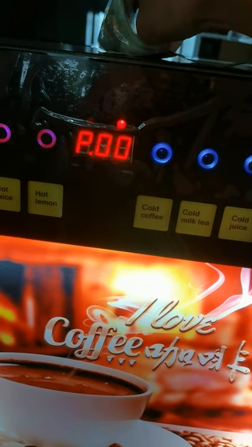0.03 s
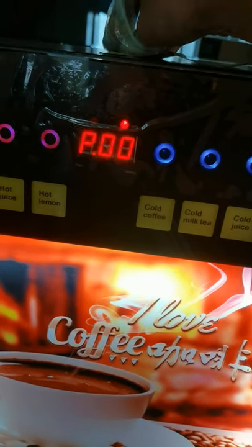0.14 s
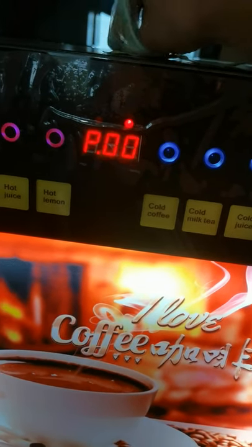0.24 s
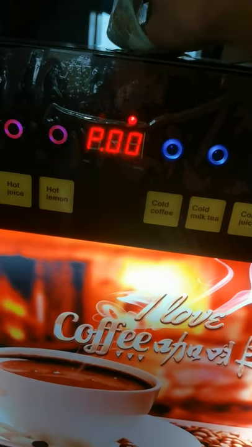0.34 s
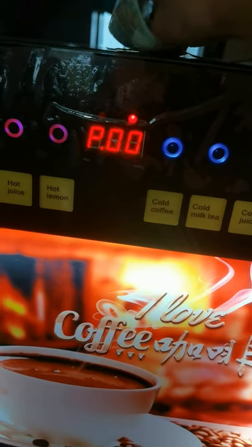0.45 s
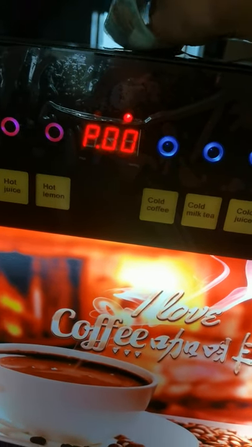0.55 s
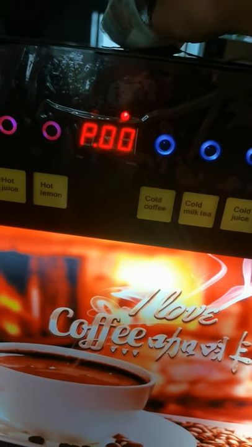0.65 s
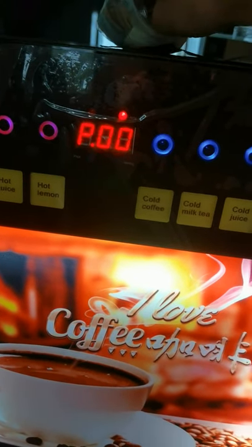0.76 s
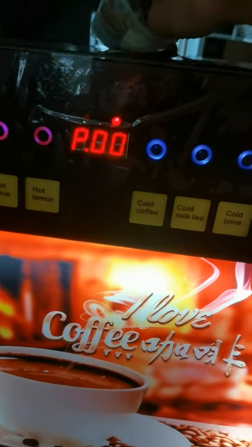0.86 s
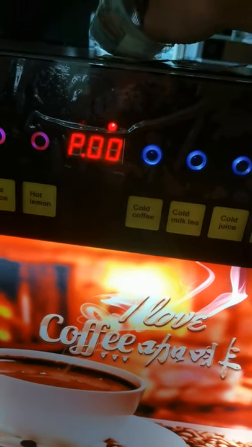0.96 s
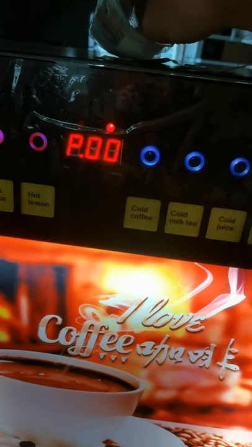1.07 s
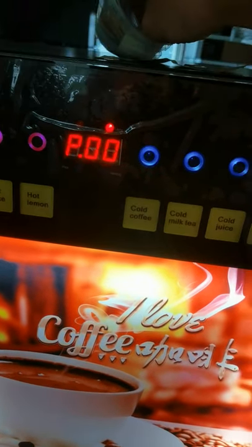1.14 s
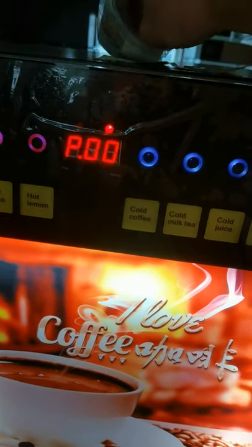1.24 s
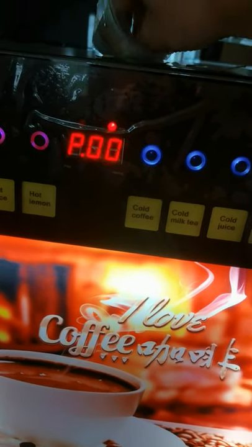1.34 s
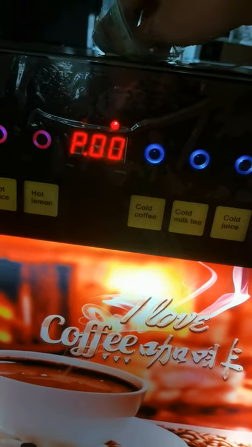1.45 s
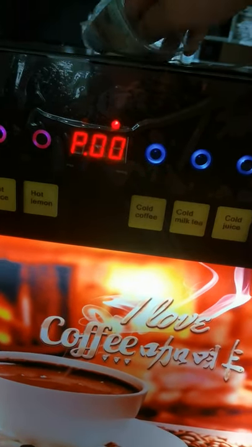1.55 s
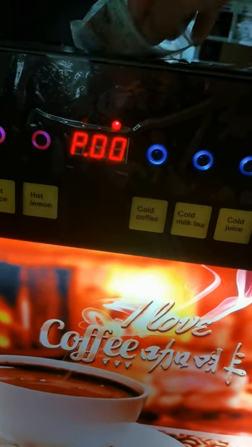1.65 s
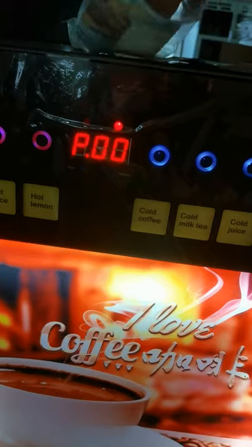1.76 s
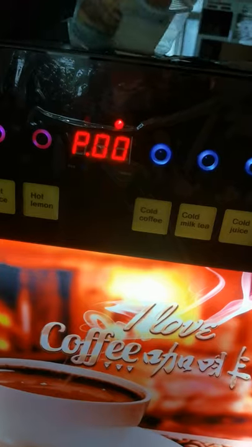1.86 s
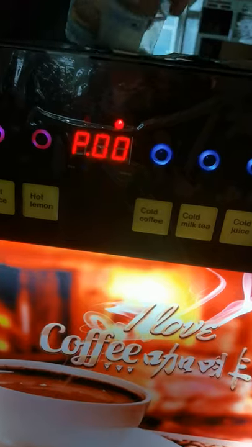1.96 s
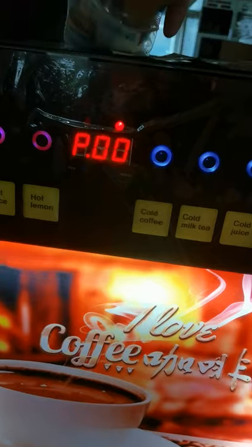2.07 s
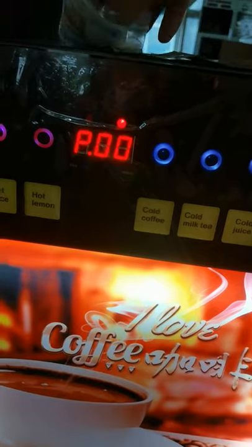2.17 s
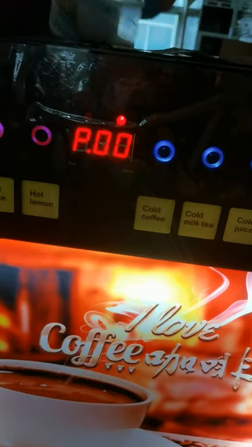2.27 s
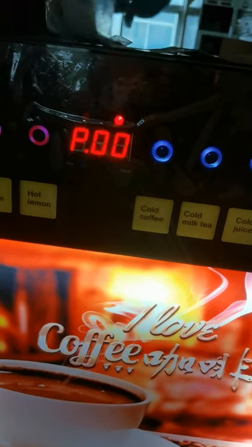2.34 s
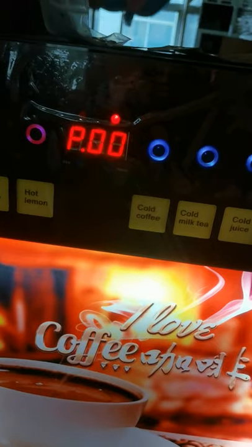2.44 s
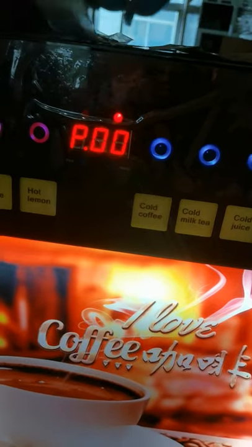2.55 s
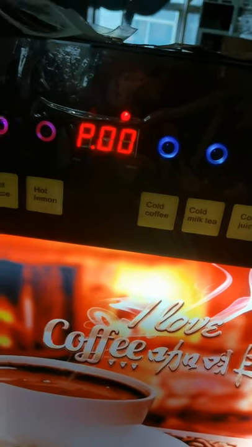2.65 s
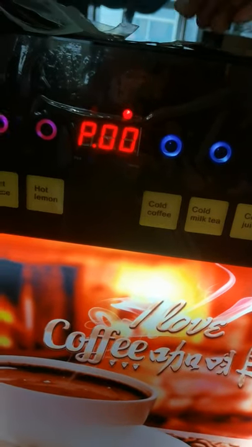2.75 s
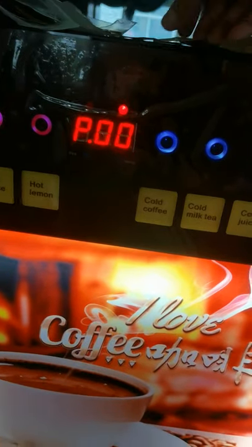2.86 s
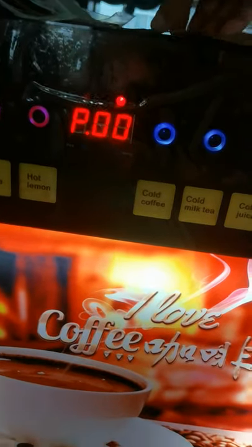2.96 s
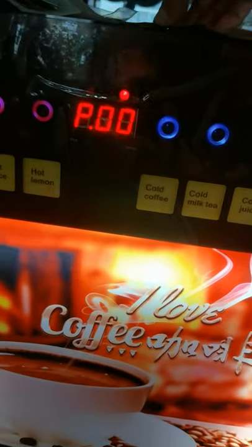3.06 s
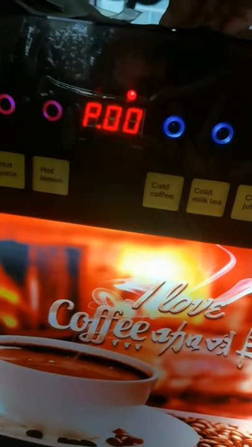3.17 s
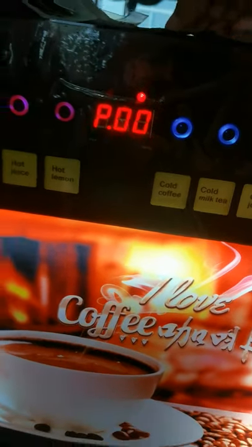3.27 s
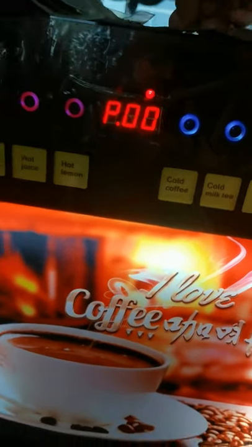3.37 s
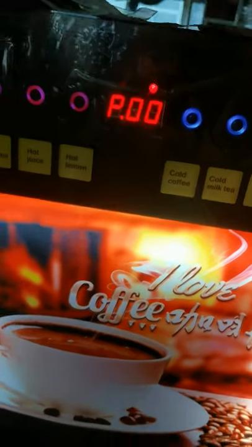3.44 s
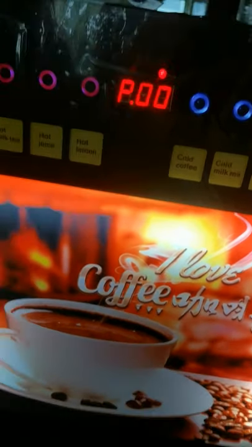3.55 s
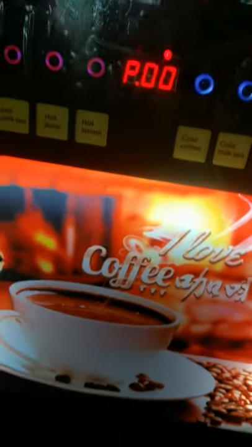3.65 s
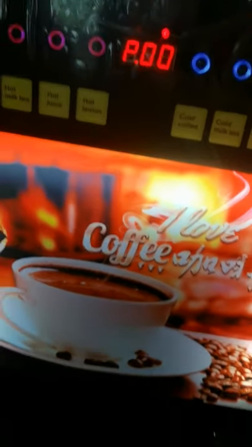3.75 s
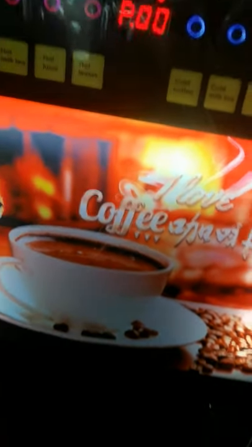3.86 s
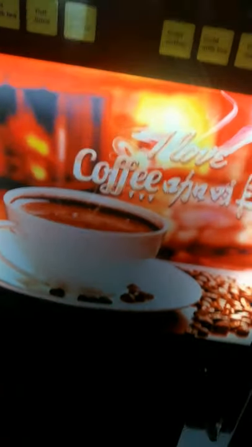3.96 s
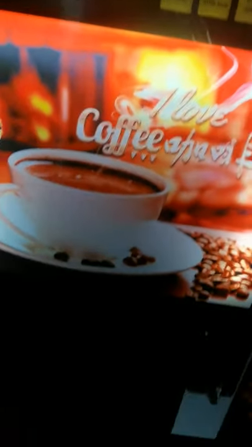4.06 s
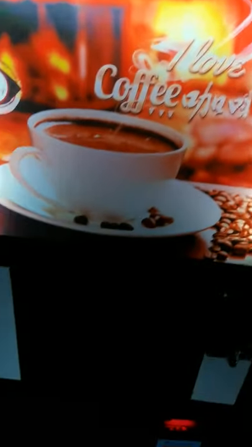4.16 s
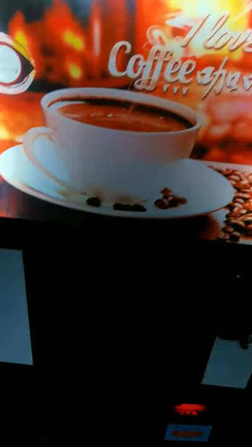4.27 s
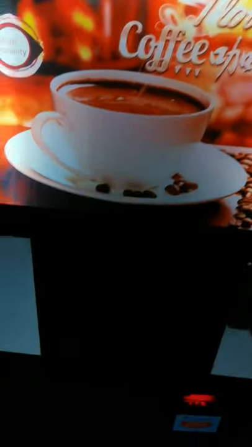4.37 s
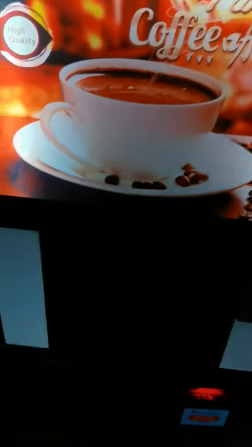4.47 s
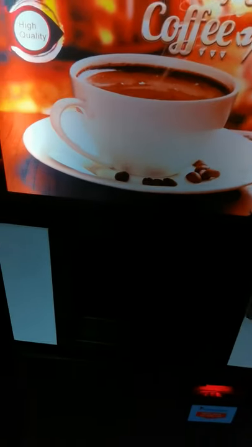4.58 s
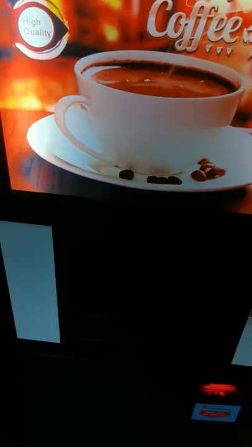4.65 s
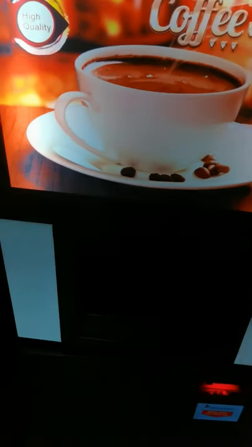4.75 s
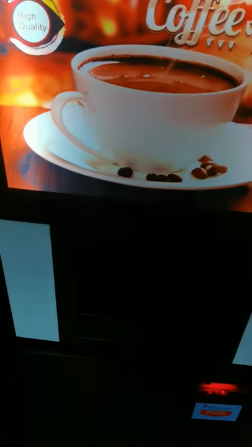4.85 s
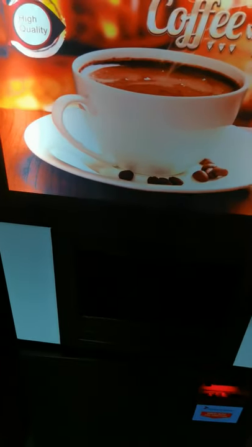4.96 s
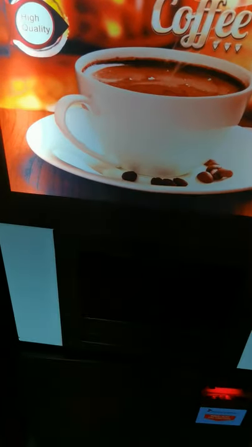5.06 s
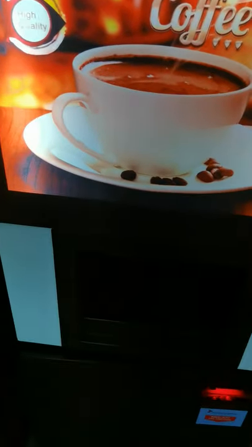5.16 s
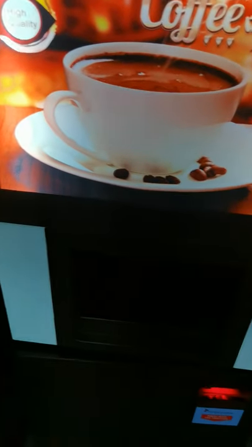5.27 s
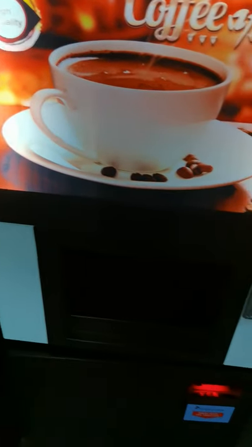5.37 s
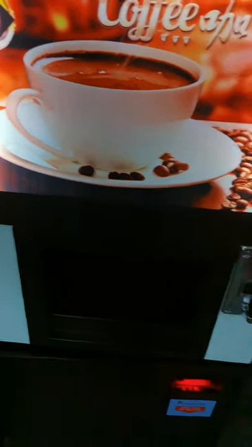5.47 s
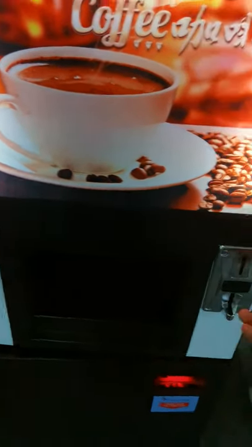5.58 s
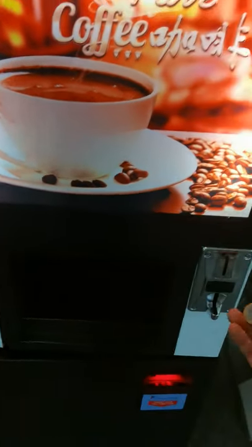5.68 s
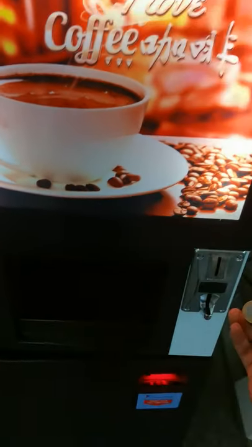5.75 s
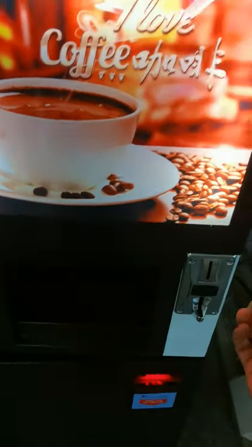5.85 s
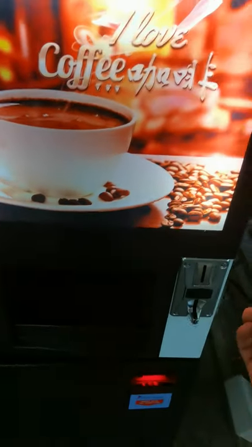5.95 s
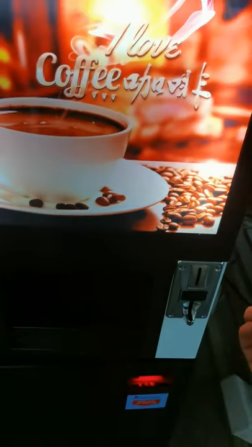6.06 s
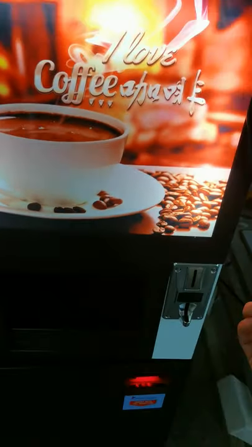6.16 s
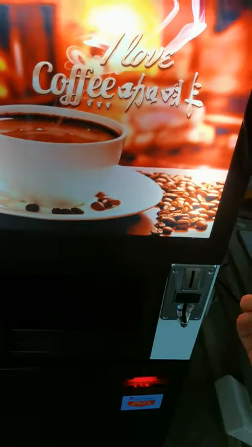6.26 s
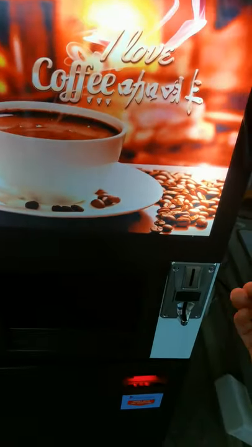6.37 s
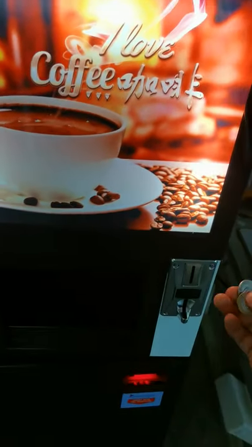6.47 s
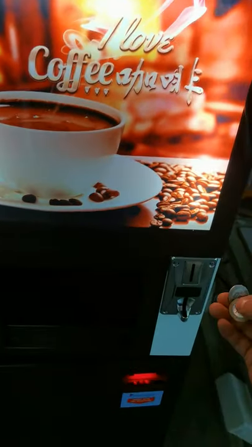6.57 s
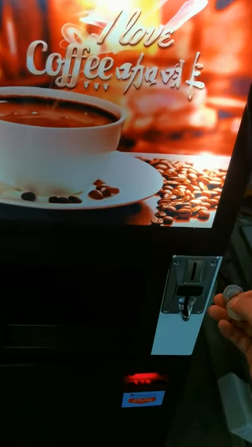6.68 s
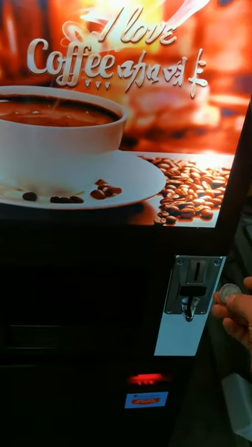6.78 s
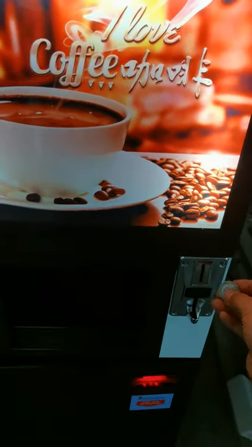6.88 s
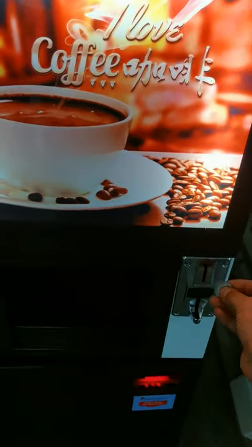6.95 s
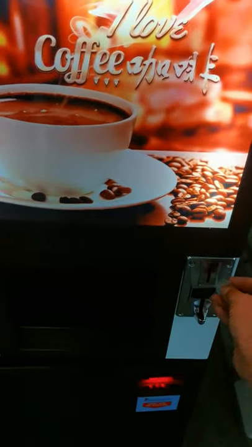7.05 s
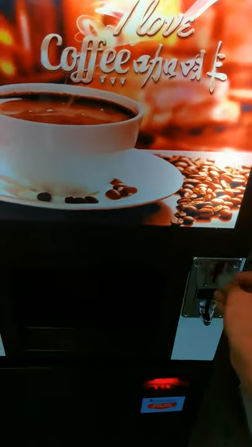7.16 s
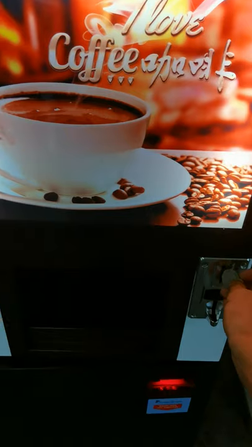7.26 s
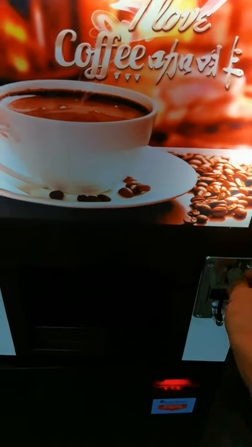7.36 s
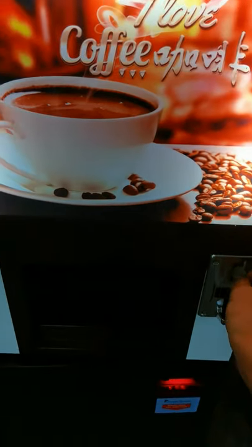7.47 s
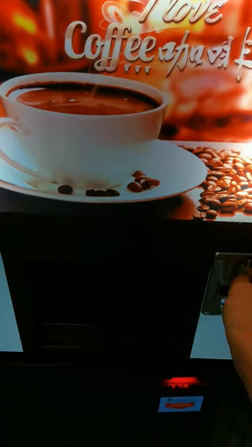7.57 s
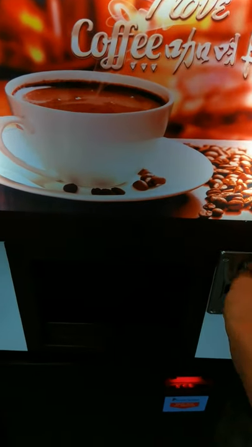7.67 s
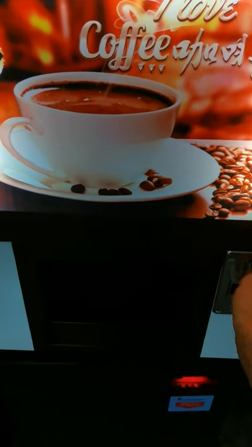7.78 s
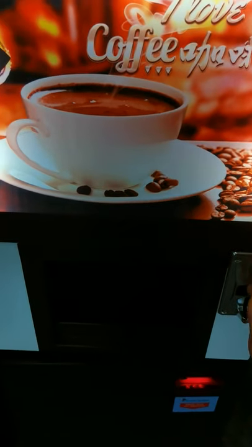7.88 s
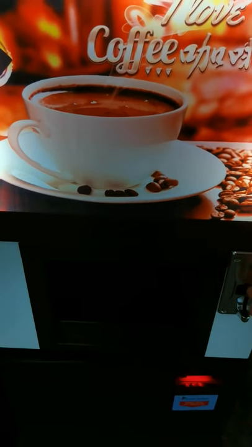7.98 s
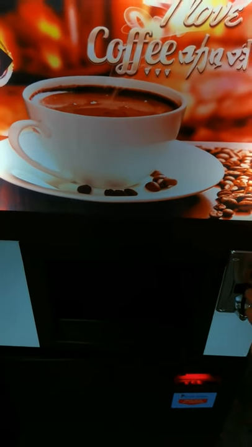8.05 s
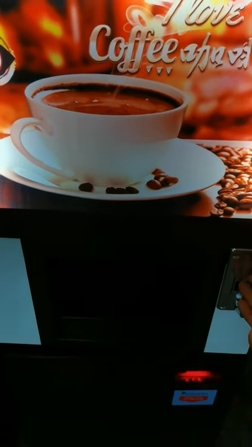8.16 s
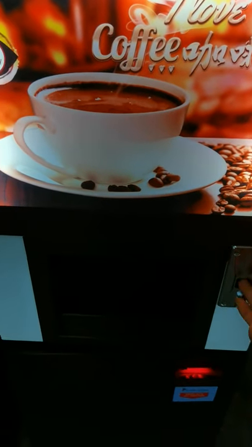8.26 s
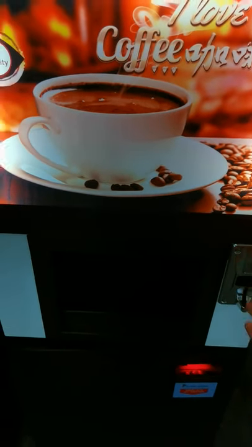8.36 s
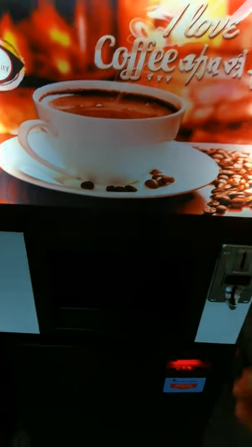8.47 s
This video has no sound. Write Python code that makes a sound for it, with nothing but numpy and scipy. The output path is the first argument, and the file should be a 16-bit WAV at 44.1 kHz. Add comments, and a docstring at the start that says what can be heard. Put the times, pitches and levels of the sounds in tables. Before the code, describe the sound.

A hand rummages through a plastic bag of coins, then a coin taps a humming vending machine's slot and rattles down the chute.

```python
"""A hand rummages in a plastic bag of coins on top of a drinks machine, and pushes make the sheet-metal
cabinet boom. At about 5 s coins knock on its front, then clink in the palm. From 7.2 s a coin taps and
scrapes the slot plate, and from 8 s it rattles down the chute. Each contact excites the damped modes of
the body it meets. Throughout, a hard room answers every click over the machine's hum and fan."""
import sys
import numpy as np
from scipy import signal
from scipy.fft import rfft, irfft, next_fast_len
from scipy.io import wavfile
from scipy.ndimage import uniform_filter1d, map_coordinates

SR = 44100
rng = np.random.default_rng(int(sys.argv[2]) if len(sys.argv) > 2 else 0)


def waveform_to_disk(signal):
    """Save audio, clipped to [-1, 1], as 16-bit WAV at the path in sys.argv[1]."""
    frames = np.transpose(np.atleast_2d(signal))
    scaled = np.clip(frames, -1, 1) * 32767
    samples = np.round(scaled).astype(np.int16)
    wavfile.write(sys.argv[1], SR, samples)


N = 375732

# Impacts. Each row: start in seconds, relative level in dB, bass in dB, brightness in dB,
# frequency of one added mode in Hz, its gain in dB, room tail in dB.
BAG_HITS = [(0.0179, -21, -8.5, -7, 2050, 22, -23), (0.1055, -6, -68, -19.5, 3450, 9, -27.5),
            (0.2239, -20.5, 0, -40, 3700, 0, -4.5), (0.3187, -7, -11, -26, 3740, 12, -32),
            (0.3379, -29.5, 2, -0.5, 1980, 7, -19), (0.4342, -30, -4, -10.5, 2180, 26, -28),
            (0.469, -29, -28.5, -9, 2050, 18.5, -20), (0.5382, -55, -3, 6.5, 4310, 39, -28),
            (0.5864, -27, -52, -16, 3800, -20, -22), (0.7888, -41.5, -67, -23, 2420, 1, -0.5),
            (0.838, -33.5, -21, -16.5, 3780, 17, -19.5), (0.8745, -26.5, -7, -23, 780, 26, -11.5),
            (0.9053, -22, 2, -17, 2240, 13, -15), (0.9328, -30.5, 13, -11.5, 6000, 11.5, -18),
            (0.943, -36, 0, -21, 3800, 6, -22), (1.0336, -28, -1, -12.5, 885, 16, -21.5),
            (1.0595, -23, -5.5, -6.5, 3300, 6, -20.5), (1.0809, -14, -50, -7, 3205, -2, -24),
            (1.1, -35, -30, -1, 5500, 6, -16), (1.2, -29.5, -20, -9.5, 4500, 9, -22),
            (1.265, -32.5, -50, -13, 5890, 26.5, -22.5), (1.3392, -25, -23, -14, 4020, 0, -21.5),
            (1.4217, -25, -12.5, -13.5, 824, 20, -19), (1.432, -21, 1, -17.5, 850, 13, -32),
            (1.4508, -27, -18.5, -23, 2956, 7, -18.5), (1.501, -39, -2.5, -4, 2350, 8, -15.5),
            (1.5873, -29, -12.5, -14.5, 2490, 10, -0.5), (1.7449, -21.5, -18.5, -27, 4400, 7, -18.5),
            (1.8083, -31, -9, -14, 4290, 1.5, -16.5), (1.8669, -13.5, -10, -6.5, 3500, -0.5, -7),
            (2.1662, -39, -13, -10.5, 5170, 9, -20), (2.176, -23, -20, -0.5, 4800, 10.5, -24.5),
            (2.194, -39.5, -25, 0, 6360, 8.5, -13.5), (2.385, -33.5, -16.5, -8.5, 3280, 22, -18),
            (2.4578, -38.5, -10.5, -8, 3400, 8, -12.5), (2.496, -38.5, -23, -5, 3020, 23, -25),
            (2.5205, -44, -35, -9.5, 3480, 8, -18), (2.5406, -21.5, -15, -6, 2420, 21.5, -24.5),
            (2.5536, -23.5, -12, -8.5, 2160, 25, -25.5), (2.566, -31, -6.5, -5.5, 2140, 17, -21.5),
            (2.6, -44.5, -15.5, 2.5, 9500, 13, -22)]
FRONT_HITS = [(4.9909, -41.5, 8.5, -20, 2000, 20, -8.5), (5.1889, -16.5, -17, -21, 3680, 7.4, -13),
              (5.229, -18, -9, -19.5, 2150, 11, -13.5), (5.248, -28, -4, -12, 1790, 5.4, -28),
              (5.2644, -24.5, -4, -16.5, 2400, 11, -32)]
PALM_HITS = [(1.1728, -23, -68, -1, 9700, 8, -11.5), (1.1891, -32.5, 1, -8.5, 3040, 8, -17),
             (3.7295, -27.5, -2, -25.5, 12230, 34.2, -23.5), (5.4778, -38.5, -33.5, 7, 11800, 20, -20),
             (5.8256, -47, -24, -11.5, 2520, 8.6, -21.5), (5.8594, -54, -21, -2, 2500, 8, -18),
             (6.2448, -40, -49.5, -3.5, 9200, 12, -14), (6.3007, -40.5, -53, -2.5, 3320, 17, -18),
             (6.3149, -56, -28.5, 13, 7100, 17, -22), (6.357, -64, -12, 6, 6360, 26, -11),
             (6.4095, -63.5, -25, 3, 6100, 33.5, -25), (6.6458, -48, -36, -3.5, 7220, 44.3, -10.5),
             (6.6543, -39.5, -17, 4, 15000, 22, -22.5), (6.8689, -46.5, -24.5, 4.5, 10900, 9, -15.5),
             (7.0459, -61, -21, 10.5, 5700, 24.6, -16)]
SLOT_HITS = [(7.2275, -49, -11.5, -10.5, 1140, 27, 2.5), (7.2544, -35, 3.5, -17, 1780, 18, -11.5),
             (7.3071, -10.5, -19, -15.5, 2430, 7.2, -12.5), (7.4744, -32.5, -20.5, -30, 1690, 22, -6),
             (7.5487, -39, -4, -25, 3500, 15, -10), (7.578, -38.5, -12, -40, 3500, 14, -18),
             (7.6361, -28, -18, -9, 3900, 11, -2.5), (7.6495, -18, -2, -0.5, 2240, 13.8, -11),
             (7.8109, -37.5, 4, -17, 1990, 27.3, -15.5), (7.9234, -48, -1.5, -47, 2070, 34.7, -7),
             (7.9568, -47, -7, -42, 2120, 36, -30)]
CHUTE_HITS = [(8.0336, -30, -3.5, -24, 2250, 10, -5), (8.104, -32, 0.5, -23, 1650, 4.2, -10),
              (8.1648, -41.5, 10, -27.5, 1690, 5.1, -6), (8.2551, -18.5, -10, -7, 1910, 11, -11),
              (8.2885, -18.5, -0.5, -18, 3580, 9.1, -11), (8.3015, -18, -7, -9.5, 3670, 14, -10.5),
              (8.3205, -16.5, -20, -11, 3300, 7.8, -15), (8.3938, -8.5, -13.5, -12.5, 935, 27.6, -6),
              (8.4677, -19, -7, -9.5, 935, 23, -0.5), (8.4991, -11.5, -14.5, -9.5, 1703, 11, -2.5),
              (8.5114, -15, -36, -7, 1690, 13, -1.5)]

# Damped modes of the struck bodies. Each row: frequency in Hz, bandwidth in Hz, gain in dB.
LID_MODES = [(520, 47.5, 17), (807, 30, 3.43), (1071, 41, 9.3), (2090, 680, 4), (3676, 270, 0.91),
             (5610, 2600, 5.4)]
FRONT_MODES = [(460, 58, 16.5), (1030, 74, 9), (1826, 133, 15.5), (2366, 100, 12.5), (3640, 90, 13.5),
               (5410, 92, 14), (6220, 77, 15)]
COIN_MODES = [(1014, 50, -34), (1850, 550, 8), (3630, 94, 9.5), (5090, 240, 6), (6260, 210, 7),
              (7700, 130, -6), (9600, 300, 6.5), (11880, 350, 19), (15200, 624, 1.5)]
PLATE_MODES = [(488, 13.4, 20), (2120, 250, 3.6), (3430, 140, 1)]
CHUTE_MODES = [(489, 19, 21.6), (931, 6.2, 13), (1171, 31, 4.99), (1736, 76, 14), (1810, 15, 5),
               (2010, 20, 9.8), (2062, 25, 13), (3424, 250, 3.3), (4500, 42, 2.15), (5340, 130, 4.1),
               (6230, 240, 7)]
# Panel modes. Each row: as above, before the response is squared.
BIG_PANEL_MODES = [(118, 8.2, 4), (146.2, 31, 2.5)]
SMALL_PANEL_MODES = [(230, 28, 0), (290, 54, -5), (352.6, 95, -10.5), (475, 120, -29)]

# Pushes. Each row: start in seconds, rise in seconds, relative peak in dB, small-panel gain in dB.
CABINET_PUSHES = [(0.04, 0.12, -37, -8.5), (0.222, 0.06, -28, -7), (0.53, 0.088, -43.5, -3),
                  (0.872, 0.11, -30.5, -4.5), (1.15, 0.12, -40.5, -14), (1.58, 0.06, -53.5, 4),
                  (1.868, 0.047, -28.5, -19), (2.52, 0.11, -60.5, 6.5), (2.8, 0.18, -27, -8),
                  (3.08, 0.035, -42, -6), (3.22, 0.13, -33, -11.5), (7.23, 0.047, -51, 7),
                  (7.42, 0.026, -53, 5), (7.645, 0.13, -47, 5.5), (8.28, 0.04, -44, 13),
                  (8.44, 0.019, -49, 3.5)]
# Friction strokes. Each row: start in seconds, rise in seconds, relative peak in dB, brightness in dB.
BAG_STROKES = [(0.0, 0.28, -46.5, 0), (0.15, 0.44, -54, -19), (0.6, 0.2, -66, 2), (1.0, 0.091, -68, -24),
               (1.55, 0.18, -44.5, -0.5), (1.9, 0.23, -53.5, 1.5), (2.17, 0.11, -60, 3.5),
               (2.34, 0.034, -57, 4.5), (2.45, 0.12, -58, -8), (5.235, 0.025, -44.5, -10.5)]
CABINET_CREAKS = [(2.88, 0.06, -51, -18), (3.27, 0.089, -51, -14.5)]

# Envelopes, the first two grouped in spans. Each row: time in seconds, relative level in dB.
PLATE_DRAG = [
    [(7.38, -52), (7.414, -55), (7.516, -51), (7.66, -64.5), (7.782, -66), (8.0, -52.5)],
]
CHUTE_ROLL = [
    [(8.02, -57.5), (8.154, -40.5), (8.324, -43), (8.45, -63), (8.52, -23)],
]
THROB_ENVELOPE = [(0.0, -51.5), (1.44, -58), (1.64, -54.5), (2.28, -55), (5.17, -60), (5.86, -50.5),
                  (6.19, -59), (6.76, -57), (7.17, -57), (7.55, -53), (7.76, -55), (8.04, -58), (8.16, -48),
                  (8.52, -72)]

# Noise spectra. Each row: frequency in Hz, relative spectral density in dB.
FRICTION_SPECTRUM = [(250, 4.5), (450, -5), (1000, -1), (2000, -1.5), (4000, -7.5), (7000, -29.5),
                     (11000, -34.5), (15800, -48)]
THROB_SPECTRUM = [(8.8, -34), (15, 7.5), (38, -7.5), (49, -2), (65, 5), (86, -15), (110, -8.5),
                  (140, -35.5), (240, -120)]
FAN_SPECTRUM = [(47, -43), (80, -7), (129, -9), (208, -15), (244, -11.5), (380, -18), (422, -18.5),
                (487, -21), (532, -25.5), (613, -24), (842, -29.5), (1680, -27.5), (2480, -27.5),
                (5500, -46.5), (7150, -82), (12100, -120)]
HISS_SPECTRUM = [(2940, -52), (5000, -16.5), (7060, -9), (8670, -18.5), (9680, -9.5), (14200, -2),
                 (15700, -5.5)]

# The machine's tones. Each row: frequency in Hz, relative level in dB.
WHINE_TONES = [(500.6, -73.5), (2202, -85), (2401, -83), (2449, -85), (2702, -83.5), (2799, -86.5)]
# Stereo width of throb and fan. Each row: frequency in Hz, correlation of left and right.
MACHINE_COHERENCE = [(60, 0.53), (180, 0.84), (550, 0.39), (1650, -0.33), (4970, 0.036), (15000, -0.04)]
# Balance of the fan. Each row: frequency in Hz, level of left over right in dB.
FAN_BALANCE = [(60, 12), (180, 1), (550, -0.5), (1650, -1.0), (4970, -1.5), (15000, -4.5)]
# The hard room. Each row: frequency in Hz, reverberation time in seconds.
ROOM_T60 = [(200, 0.21), (1000, 0.71), (4000, 0.44), (8000, 0.39), (15000, 0.37)]

CRACK_RISE_S, ROOM_RISE_S = 0.00029, 0.0064
FAN_DB, HISS_DB = -58, -77
BAND_LIMIT_HZ = 15800


def coin_impacts():
    """Impact excitation: coins sound the modes of lid, front, one another, slot plate and chute."""
    lid = impacts(BAG_HITS, LID_MODES, t60_s=0.007, scatter_db=3, pan_db=-8, top_db=-9.5, lag_samples=14)
    front = impacts(FRONT_HITS, FRONT_MODES, t60_s=0.026, scatter_db=1.5, pan_db=-8, top_db=-11.5)
    palm = impacts(PALM_HITS, COIN_MODES, t60_s=0.014, scatter_db=3.5, pan_db=-10, top_db=-9.5)
    slot = impacts(SLOT_HITS, PLATE_MODES, t60_s=0.059, scatter_db=5.5, pan_db=-8, top_db=-11)
    chute = impacts(CHUTE_HITS, CHUTE_MODES, t60_s=0.057, scatter_db=3, pan_db=-7.5, top_db=-5.5)
    return lid + front + palm + slot + chute


def impacts(hits, body, t60_s, scatter_db, pan_db, top_db, lag_samples=0):
    """Source and filter: a short noise crack and its room tail pass through the body's resonances."""
    pad = 256  # samples ahead of each contact
    out = np.zeros((2, N + SR))
    t = np.arange(-pad, SR // 2) / SR
    envelope = (1 - np.exp(-np.maximum(t, 0) / CRACK_RISE_S)) * amp(-60 * t / t60_s)
    side_db = np.array([[pan_db / 2], [-pan_db / 2]])
    for start, db, low_db, bright_db, ring_hz, ring_db, room_db in hits:
        colour = [(70, low_db - 31), (200, low_db - 13), (450, low_db), (950, low_db + 7),
                  (1900, 0.21 * low_db), (3500, 0.0098), (7800, bright_db),
                  (12500, top_db + 0.77 * bright_db)]
        # Each blow lands elsewhere and weights the modes differently.
        modes = [(hz, width, gain + scatter_db * rng.standard_normal()) for hz, width, gain in body]
        modes.append((ring_hz, 0.061 * ring_hz, ring_db))
        crack = envelope * rng.standard_normal(len(t))
        crack *= np.linalg.norm(envelope) / np.linalg.norm(crack)
        drive = amp(side_db) * crack + amp(room_db + 0.17 * side_db) * room_tail(t)
        response = lambda hz: amp(along(colour, hz)) * (1.5 + resonances(modes, hz))
        left, right = amp(db - 4) * filtered(drive, response)
        out[0, round(start * SR):][:len(t)] += left
        out[1, round(start * SR) + lag_samples:][:len(t)] += right
    return out[:, pad:N + pad]


def cabinet_boom():
    """Forced vibration: uneven pushes drive a few low modes of the sheet-metal panels."""
    push_db, small_db = swells(CABINET_PUSHES, rise_db=6, fade_db_per_s=134.5)
    force = amp(push_db + 0.24 * wobble(28))
    panels = lambda modes: stereo_noise(lambda hz: abs(resonances(modes, hz)) ** 2,
                                        coherence=[(100, 0.7), (500, 0.875)])
    return force * (amp(-5) * panels(BIG_PANEL_MODES) + amp(small_db) * panels(SMALL_PANEL_MODES))


def scrapes():
    """Friction: the bag slides, the pushed cabinet rasps, a coin rubs along plate and chute."""
    handling = sum(friction(*swells(strokes, rise_db=10, fade_db_per_s=173), LID_MODES)
                   for strokes in (BAG_STROKES, CABINET_CREAKS))
    drag = friction(level_curve(*PLATE_DRAG), bright_db=-7, body=PLATE_MODES)
    roll = friction(level_curve(*CHUTE_ROLL), bright_db=-17.5, body=CHUTE_MODES)
    return handling + drag + roll


def friction(level_db, bright_db, body):
    """Stick and slip: many tiny catches modulate a hiss coloured by the body's resonances."""
    catches = amp(3 * wobble(150) + 1.5 * wobble(40))
    ticks = amp(5 * wobble(250) + 2.5 * wobble(30))  # in the treble the catches stand apart
    metal = lambda hz: amp(along(FRICTION_SPECTRUM, hz)) * (1 + resonances(body, hz))
    lowpass = lambda hz: 1 / (1 + (hz / 4500) ** 6)
    dull = stereo_noise(lambda hz: metal(hz) * lowpass(hz), coherence=[(400, 0.67), (3000, 0.16)])
    fizz = stereo_noise(lambda hz: metal(hz) * (1 - lowpass(hz)), coherence=[(5000, 0.1)])
    rasp = unit(catches * dull) + amp(bright_db) * unit(ticks * fizz)
    return amp(level_db) * rasp * amp([[-2], [2]])


def room_tail(t):
    """Reverberation: diffuse sound builds up, then decays exponentially at each frequency's own rate."""
    hz, frame_s, spectrum = signal.stft(rng.standard_normal((2, len(t))), SR, nperseg=256)
    decay = amp(-60 * frame_s / along(ROOM_T60, hz)[:, None])
    tail = signal.istft(spectrum * decay, SR, nperseg=256)[1][:, :len(t)]
    tail *= 1 - np.exp(-np.maximum(t, 0) / ROOM_RISE_S)
    early_boost = 1 + 1.2 * np.exp(-t / 0.019)  # near surfaces reflect most strongly
    return tail * early_boost + 0.047 * tail[::-1]  # a little of each channel reaches the other


def machine_hum():
    """Superposition: a low throb, broadband fan noise and thin, slightly unsteady tones add up."""
    throb = amp(level_curve(THROB_ENVELOPE) + 6 + 1.5 * wobble(3.915))
    throb = throb * stereo_noise(lambda hz: amp(along(THROB_SPECTRUM, hz)), MACHINE_COHERENCE)
    fan = amp(FAN_DB + 0.29 * wobble(1.9))
    fan = fan * stereo_noise(lambda hz: amp(along(FAN_SPECTRUM, hz)), MACHINE_COHERENCE)
    fan = filtered(fan, lambda hz: amp(along(FAN_BALANCE, hz) * [[0.5], [-0.5]]))
    t = np.arange(N) / SR
    whine = sum(amp(db + 4.5 + 0.7 * wobble(3.53)) * np.sin(2 * np.pi * hz * t + 0.46 * wobble(5.9))
                for hz, db in WHINE_TONES)
    return throb + fan + whine


def resonances(modes, hz):
    """Modal summation: the complex responses of damped oscillators add."""
    return sum(amp(db) * 1j * hz * width / (centre ** 2 - hz ** 2 + 1j * hz * width)
               for centre, width, db in modes)


def stereo_noise(response, coherence):
    """Partial coherence: mid and side noise mix to a set correlation, at an rms of 1."""
    def mid_side(hz):
        angle = np.arccos(np.clip(along(coherence, hz), -1, 1)) / 2
        return response(hz) * [np.cos(angle), np.sin(angle)]
    mid, side = filtered(rng.standard_normal((2, N)), mid_side)
    return unit(np.array([mid + side, mid - side]))


def swells(strokes, rise_db, fade_db_per_s):
    """Exponential growth and decay: the loudest stroke's level in dB and its last column, per sample."""
    start, rise_s, peak_db, tone_db = np.transpose(strokes)[..., None]
    past_peak = np.arange(N) / SR - start - rise_s
    shape_db = np.where(past_peak < 0, rise_db * past_peak / rise_s, -fade_db_per_s * past_peak)
    level_db = np.where(past_peak < -rise_s, -120, peak_db + shape_db)
    return [uniform_filter1d(c, size=400) for c in (level_db.max(0), tone_db[level_db.argmax(0), 0])]


def level_curve(*spans):
    """Linear interpolation of level in dB over time, falling to silence outside the spans."""
    points = []
    for span in spans:
        points += [(span[0][0] - 0.02, -100), *span, (span[-1][0] + 0.05, -100)]
    return np.interp(np.arange(N) / SR, *np.transpose(points))


def wobble(rate):
    """Random modulation: a smooth curve with rate knots a second."""
    return map_coordinates(rng.standard_normal(int(N * rate / SR) + 4), [np.arange(N) * rate / SR])


def filtered(x, response):
    """Linear filtering: the spectrum is multiplied by a frequency response."""
    size = next_fast_len(x.shape[-1] + 8192)
    return irfft(rfft(x, size) * response(np.fft.rfftfreq(size, 1 / SR)), size)[..., :x.shape[-1]]


def along(points, hz):
    """Interpolation on a logarithmic frequency axis."""
    knots_hz, values = np.transpose(points)
    return np.interp(np.log(hz + 1), np.log(knots_hz + 1), values)


def amp(db):
    """Decibels as an amplitude ratio."""
    return 10 ** (np.asarray(db) / 20)


def unit(x):
    """Normalisation to an rms of 1."""
    return x / np.sqrt(np.mean(x ** 2) + 1e-20)


def scene():
    """Superposition: the pressures of all sources add in each channel."""
    return coin_impacts() + cabinet_boom() + scrapes() + machine_hum()


def record(dry):
    """Self-noise and bandwidth: the microphone adds hiss and passes nothing above its band limit."""
    hiss = stereo_noise(lambda hz: amp(along(HISS_SPECTRUM, hz)), coherence=[(8000, 0.00058)])
    return filtered(dry + amp(HISS_DB) * hiss, lambda hz: hz < BAND_LIMIT_HZ)


dry = scene()
out = record(dry)
waveform_to_disk(out)
```